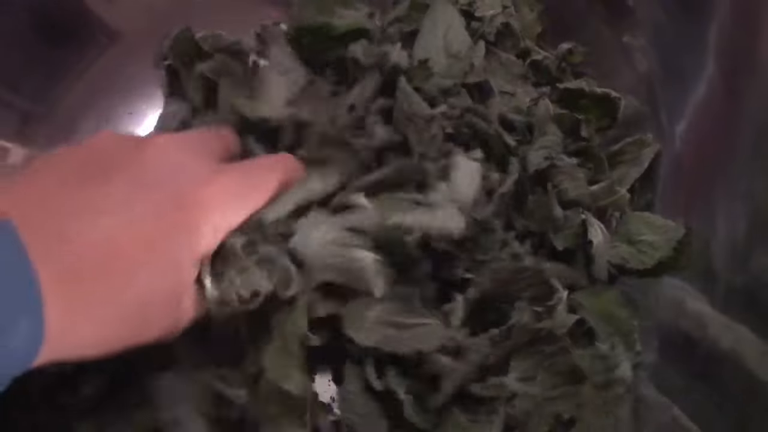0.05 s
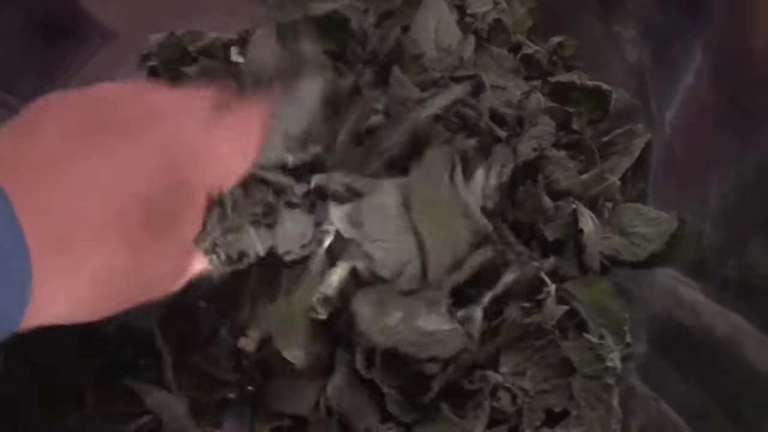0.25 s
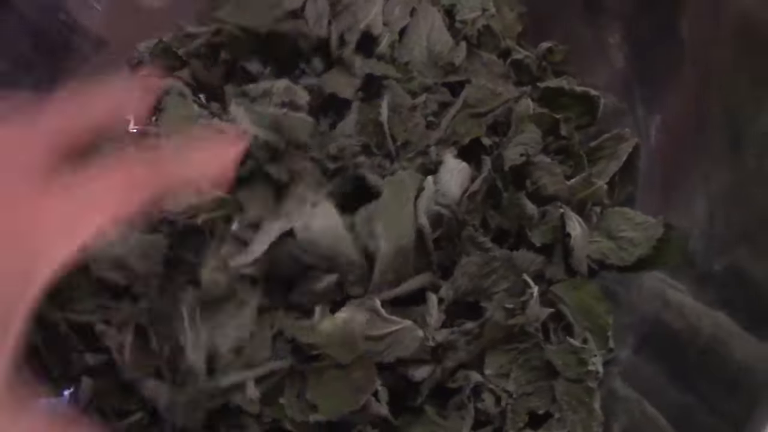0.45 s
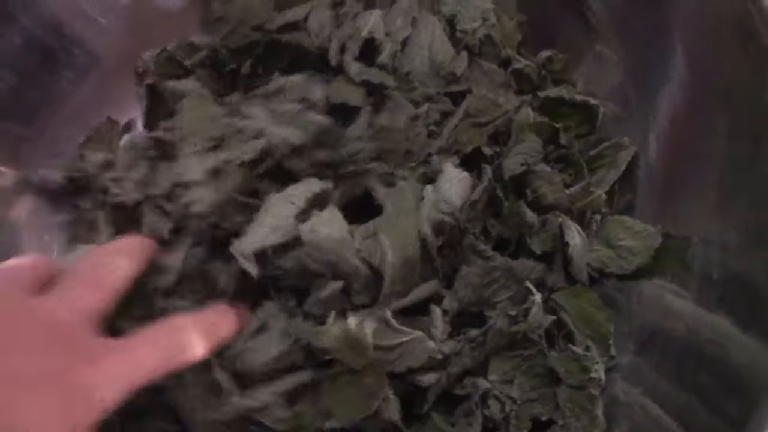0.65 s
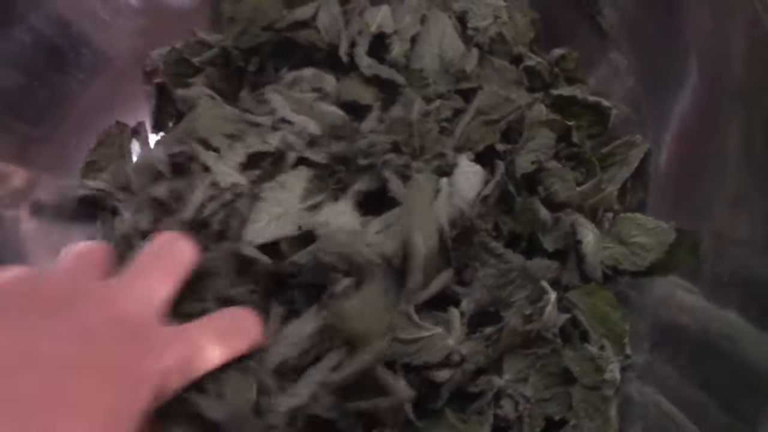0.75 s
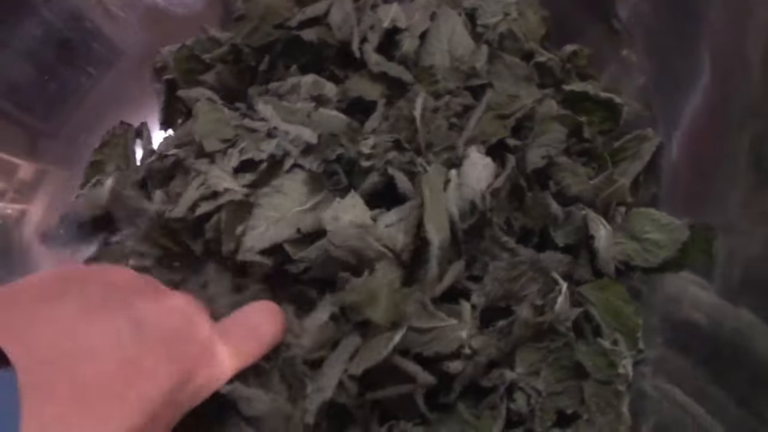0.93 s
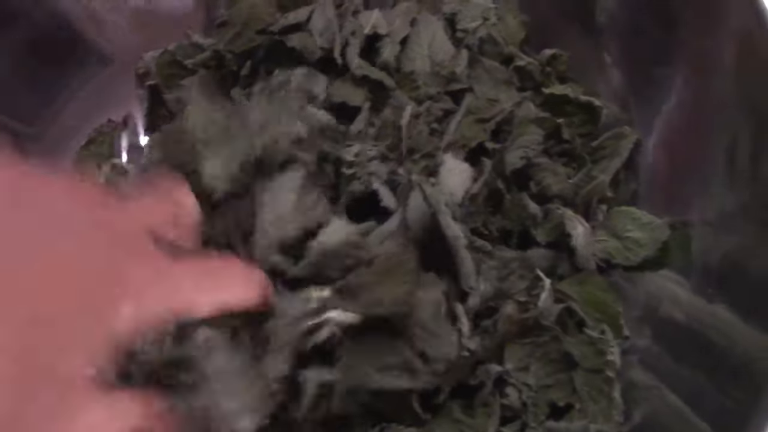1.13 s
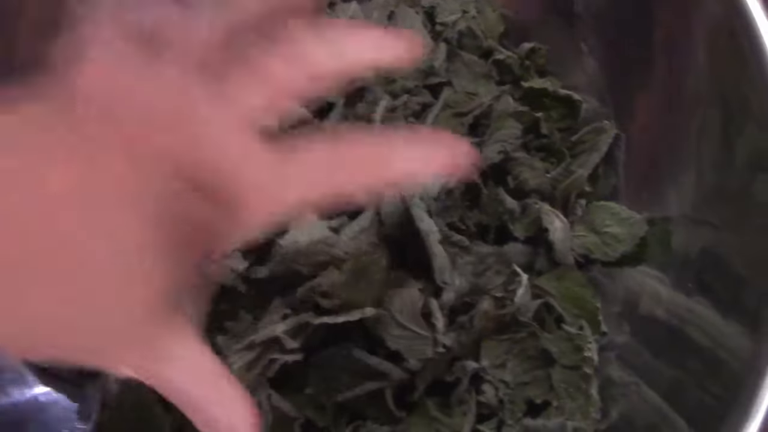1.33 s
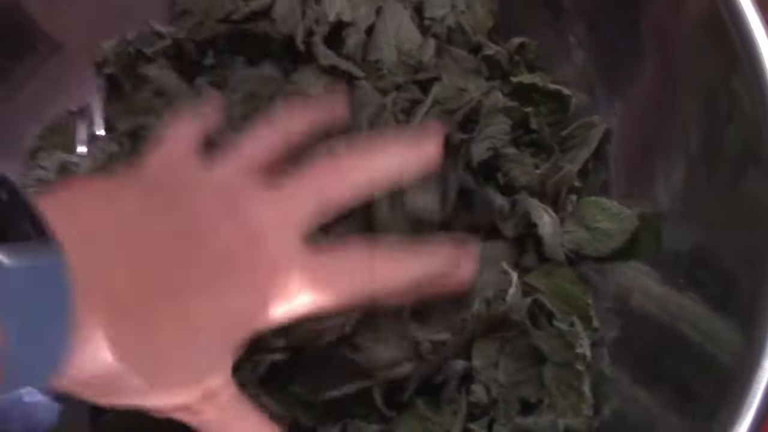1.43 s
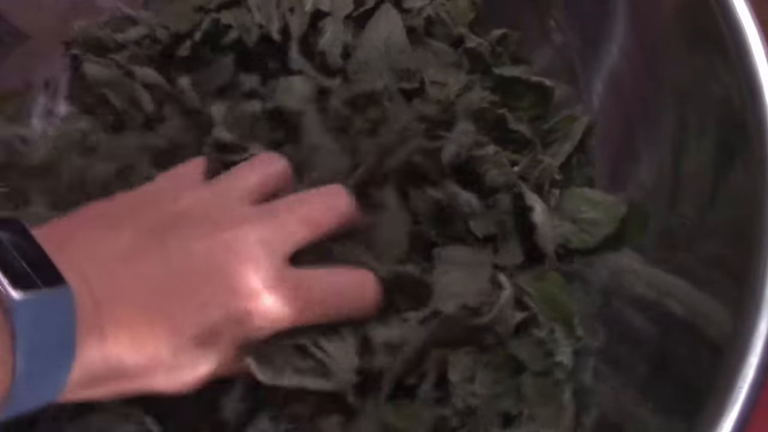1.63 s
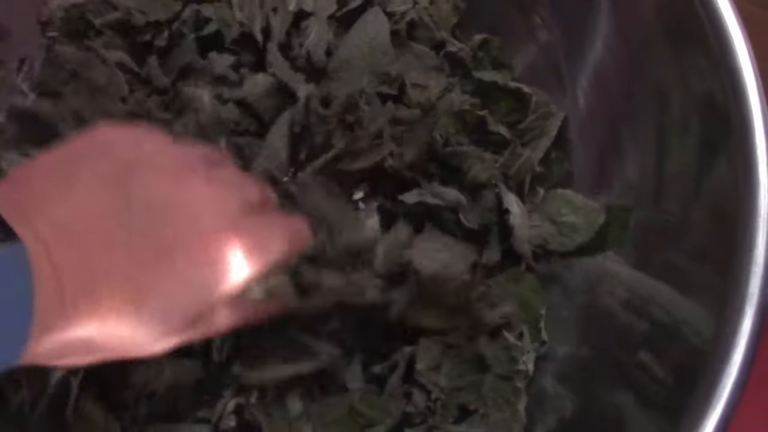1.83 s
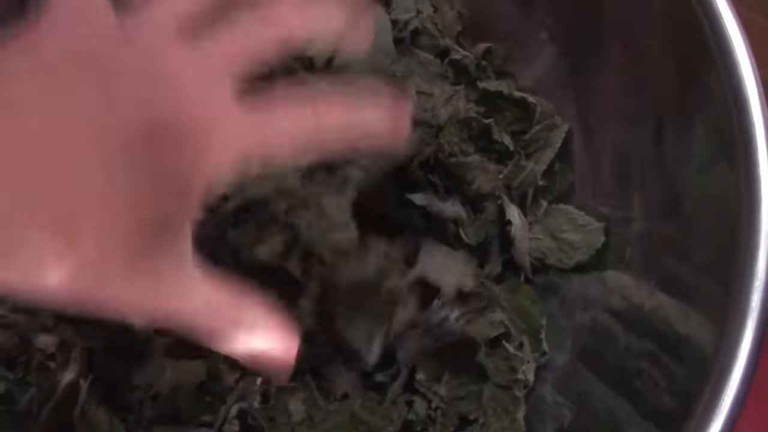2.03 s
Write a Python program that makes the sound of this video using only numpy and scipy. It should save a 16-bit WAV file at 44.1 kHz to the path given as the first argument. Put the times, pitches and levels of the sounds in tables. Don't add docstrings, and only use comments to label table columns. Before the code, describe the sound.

Dry leaves crunch and crackle as a hand squeezes them in a metal bowl, close up

```python
import sys
import numpy as np
from scipy import signal
from scipy.fft import rfft, irfft, next_fast_len
from scipy.io import wavfile
from scipy.ndimage import uniform_filter1d, map_coordinates

SR = 44100
rng = np.random.default_rng(int(sys.argv[2]) if len(sys.argv) > 2 else 0)


def to_wav(s):
    ch = np.atleast_2d(s).T
    pcm = np.round(np.clip(ch, -1, 1) * 32767)
    wavfile.write(sys.argv[1], SR, pcm.astype(np.int16))


def volts(x):
    e = np.asarray(x, float) / 20
    return 10 ** e


N = 91683


def unit(x):
    return x / np.sqrt(np.mean(x ** 2) + 1e-20)


def along(points, hz):
    f, v = np.transpose(points)
    return np.interp(np.log(hz + 1), np.log(f + 1), v)


def wobble(knots_per_s):
    return map_coordinates(rng.standard_normal(400), [np.arange(N) * knots_per_s / SR])


def coloured(x, level_db):
    m = 2 * next_fast_len(N // 2 + 4096)
    gain = volts(level_db(np.fft.rfftfreq(m, 1 / SR)))
    cepstrum = irfft(np.log(np.maximum(gain, 1e-6)), m)
    cepstrum[1:m // 2] *= 2
    cepstrum[m // 2 + 1:] = 0
    return irfft(rfft(x, m) * np.exp(rfft(cepstrum)), m)[..., :N]


def pings(start_s, hz, cycles, size, count):
    t = np.arange(count) / SR
    at = (start_s * SR).astype(int)[:, None] + np.arange(count)
    decay = np.exp(-np.pi * t * (hz / cycles)[:, None])
    wave = size[:, None] * np.sin(2 * np.pi * hz[:, None] * t) * decay
    return np.bincount(at.ravel(), wave.ravel(), N + count)[:N]


def grip():
    # time_s, level_db
    squeezes = [(0, -18), (.17, -21), (.25, -35), (.42, -37), (.545, -43.5), (.64, -37.5), (.69, -26.5),
                (.76, -19.5), (.99, -22.5), (1.015, -29.5), (1.1, -30.5), (1.13, -34.5), (1.33, -55),
                (1.425, -53), (1.485, -20.5), (1.76, -20.5), (1.875, -43.5), (2.08, -46.5)]
    # centre_s, level_db, half_length_s
    slips = [(.3, -32, .025), (.573, -27.5, .011), (.593, -33, .012), (.442, -36, .008), (1.045, -22, .02),
             (1.925, -33.5, .03), (1.16, -38, .015), (1.205, -41, .01), (1.83, -32, .02), (.208, -27, .016),
             (1.452, -35, .008), (1.57, -25, .04), (1.085, -28, .015)]
    t = np.arange(N) / SR
    power = volts(2 * np.interp(t, *np.transpose(squeezes)))
    for centre_s, level_db, half_s in slips:
        power = power + volts(2 * level_db) * np.exp(-((t - centre_s) / half_s) ** 2)
    return power


def crunch():
    # freq_hz, density_db
    leaf = [(200, -64), (450, -32.5), (772, -11.5), (1380, -15), (3400, -10), (4790, -12.5), (6900, -5),
            (15800, -22)]
    # centre_hz, width_hz, lift_db
    hollows = [(790, 500, -5.5), (3140, 510, 0.5), (6800, 670, -2)]
    density_share, grain_cycles = .18, 1.8
    clump_db, spread_db, biggest = 1.2, 4.3, 2.4
    hiss_db, tilt_per_db = -6, 0.0045

    t, power = np.arange(N) / SR, grip()
    level = np.sqrt(power) * volts(clump_db * (wobble(170) + .4 * wobble(70)))
    chance = np.minimum(level / np.sqrt(power.max()), 1) ** (2 * density_share)

    u = rng.random((15000, 5))
    u = u[u[:, 4] < np.interp(u[:, 0] * t[-1], t, chance)]
    start_s = u[:, 0] * t[-1]
    hz = 400 + 16000 * u[:, 1] ** 1.294

    grip_db = np.interp(start_s, t, 10 * np.log10(power / power.max()))
    size = volts(spread_db * biggest * np.tanh(-np.log(u[:, 2]) / biggest))
    size *= np.sqrt(hz) * (hz / 5000) ** (tilt_per_db * grip_db)
    size *= np.sign(u[:, 3] - .5) * np.interp(start_s, t, level / np.sqrt(chance))

    grains = unit(pings(start_s, hz, grain_cycles, size, count=128))
    grains += volts(hiss_db) * unit(level * rng.standard_normal(N))

    def colour_db(f):
        lift = sum(db / (1 + ((f - c) / w) ** 2) for c, w, db in hollows)
        return along(leaf, f) + lift

    return unit(coloured(grains, colour_db)) * np.sqrt(power.mean())


def bowl(x):
    # freq_hz, t60_s
    decay = [(500, 0.17), (4000, 0.048), (14000, 0.041)]
    out, step = np.zeros(N + SR), SR // 60
    for k in range(0, N, step):
        hz, t, z = signal.stft(rng.standard_normal(SR // 10), SR, nperseg=64)
        fade = volts(-60 * t / along(decay, hz)[:, None])
        tail = signal.istft(z * fade, SR, nperseg=64)[1]
        wet = signal.fftconvolve(x[k:k + step], tail / np.linalg.norm(tail))
        out[k + 20:][:len(wet)] += wet
    return out[:N]


def kitchen():
    # freq_hz, density_db
    room = [(30, -40), (100, -3), (380, 2.5), (700, -2.5), (1500, -8), (4000, -16), (9000, -32.5),
            (15800, -62)]
    room_db, hum_hz, hum_db = -40, 118, -52
    air = unit(coloured(rng.standard_normal(N), lambda f: along(room, f)))
    air = air * volts(room_db + 0.37 * wobble(9.75))
    hum_level = volts(hum_db + wobble(7.15))
    return air + hum_level * np.sin(2 * np.pi * hum_hz * np.arange(N) / SR + 1.2 * wobble(8.6))


def bumps():
    # start_s, peak_db, pitch_hz
    knocks = [(0.206, -36.5, 384), (0.224, -43, 76), (.53, -39.5, 367), (0.541, -35, 138),
              (.57, -37.5, 110), (.605, -43, 65), (0.722, -40.5, 274), (0.719, -41, 70), (.83, -47, 60),
              (1.02, -39, 515), (1.753, -51, 326), (1.809, -39, 111)]
    t60_s, rise_s, gain_db = 0.095, 0.016, 13.5
    out, t = np.zeros(N + SR), np.arange(SR // 4) / SR
    for start_s, peak_db, hz in knocks:
        ring = np.sin(2 * np.pi * hz * t) + 0.46 * np.sin(np.pi * hz * t)
        envelope = volts(peak_db + gain_db - 60 * t / t60_s) * (1 - np.exp(-t / rise_s))
        out[round(start_s * SR):][:len(t)] += envelope * ring
    return out[:N]


def snaps():
    # start_s, peak_db, pitch_hz
    stems = [(.405, -27, 6850), (0.4618, -11, 5970), (.498, -26.5, 7400), (.523, -19, 9300),
             (.557, -21, 4230), (.636, -22, 9000), (.591, -23, 10500), (.6504, -16, 5000),
             (0.683, -10, 6500), (0.747, -10, 6530), (0.8002, -12, 6170), (0.967, -8.5, 5970),
             (0.982, -6, 7700), (.993, -2, 7540), (1.024, -25, 3000), (1.04, 2.5, 8050), (1.085, -8, 5150),
             (1.208, -49, 7300), (1.238, -20.5, 9600), (1.29, -23, 7260), (1.309, -56, 8500),
             (1.356, -27, 7700), (1.378, -55.5, 11000), (1.385, -47, 9000), (1.485, -14, 6300),
             (1.4961, -8, 5900), (1.593, -12, 2150), (1.609, -23, 6900)]
    ring_cycles, splinter_s, loss_db, crack_db = 4.6, 0.00062, -3.5, -11
    start_s, peak_db, hz = np.transpose(stems)
    u, k = rng.standard_normal((len(start_s), 2, 6)), np.arange(6)

    splinter_start_s = start_s[:, None] + splinter_s * k * np.abs(u[:, 0]) ** .5
    pitch_hz = np.clip(hz[:, None] * np.exp(0.32 * u[:, 1] * (k > 0)), 500, 15000)
    size = volts(peak_db[:, None] + loss_db * k)
    ring = pings(splinter_start_s.ravel(), pitch_hz.ravel(), ring_cycles, size.ravel(), count=256)

    crack = pings(start_s, 9000 + 0 * hz, .8, volts(peak_db + crack_db), count=64)
    return ring + np.gradient(crack)


def scene():
    # freq_hz, left_over_right_db
    lean = [(60, 2.8), (300, 3), (950, 2.3), (2400, 1.5), (4400, 1.7), (8000, 3.1), (15000, 1.6)]
    bowl_db, apart_db = -6, -44
    duck_over_db, duck_slope, duck_s = -33, .45, .1

    leaves = crunch() + snaps()
    loud_db = 10 * np.log10(np.abs(uniform_filter1d(grip(), int(duck_s * SR))))
    room = kitchen() * volts(-duck_slope * np.maximum(loud_db - duck_over_db, 0))
    ringing = (leaves + volts(bowl_db) * bowl(leaves)) / np.sqrt(1 + volts(2 * bowl_db))
    mono = ringing + bumps() + room

    apart = volts(apart_db) * bowl(mono)
    lean_db = along(lean, np.fft.rfftfreq(2 * N, 1 / SR))
    sides = []
    for side in (1, -1):
        spectrum = rfft(mono + side * apart, 2 * N)
        sides.append(irfft(spectrum * volts(side * lean_db / 2))[:N])
    return np.array(sides)


def low_pass(x):
    return signal.sosfilt(signal.butter(12, 16260, fs=SR, output="sos"), x)


def record(dry):
    peak, knee, low_cut_hz, top_hz = .42, 4, 80, 15880
    rounded = dry / (1 + np.abs(dry / peak) ** knee) ** (1 / knee)

    def response_db(f):
        return -20 * np.log10(1 + (low_cut_hz / (f + 1)) ** 2) - 90 * (f > top_hz)

    return low_pass(coloured(rounded, response_db))


dry = scene()
out = record(dry)
to_wav(out)
```